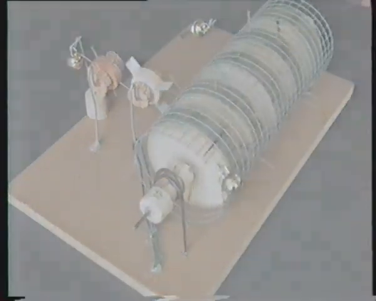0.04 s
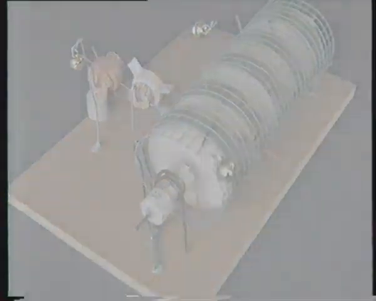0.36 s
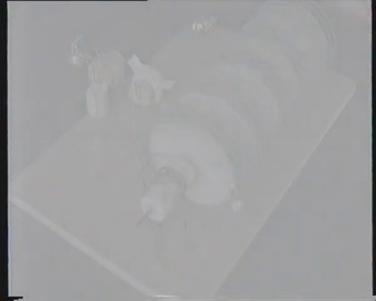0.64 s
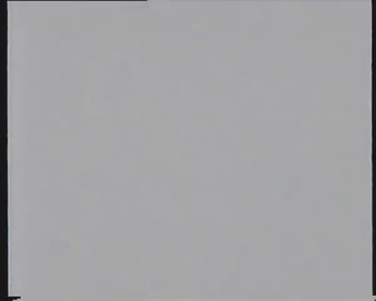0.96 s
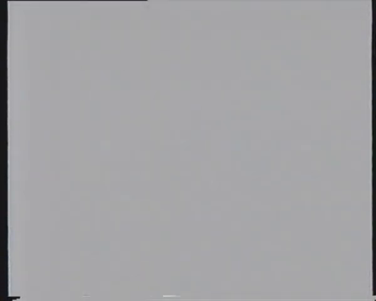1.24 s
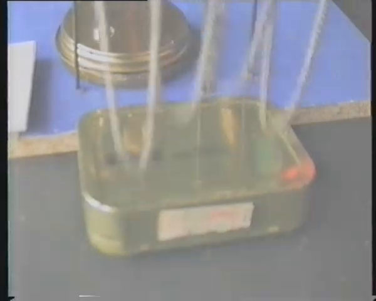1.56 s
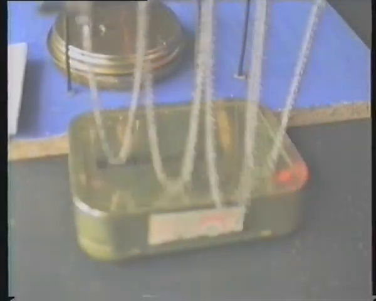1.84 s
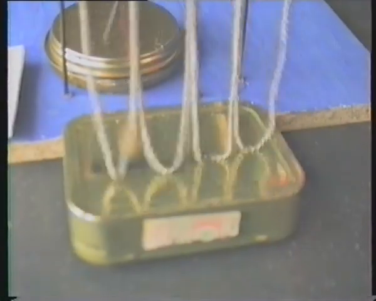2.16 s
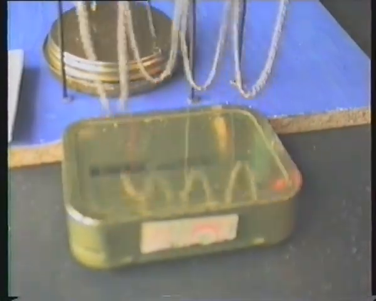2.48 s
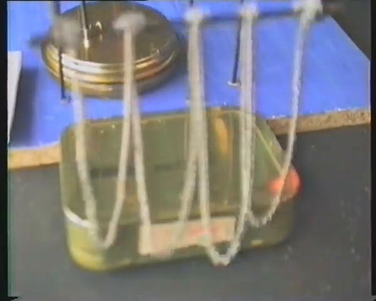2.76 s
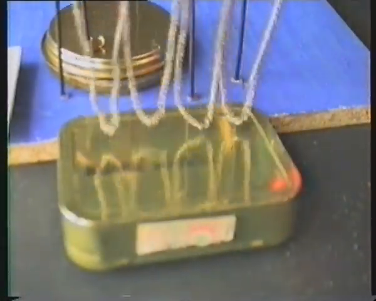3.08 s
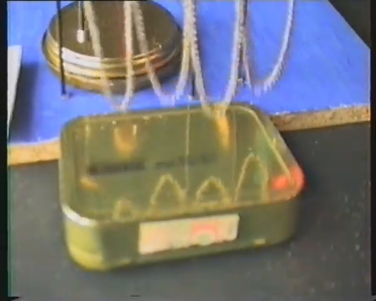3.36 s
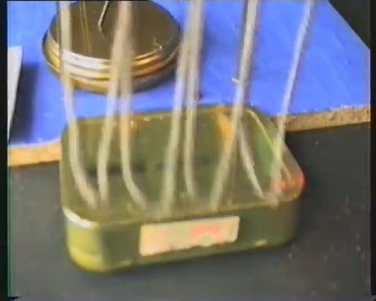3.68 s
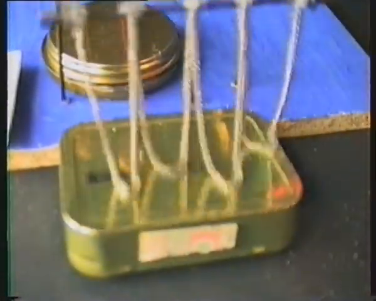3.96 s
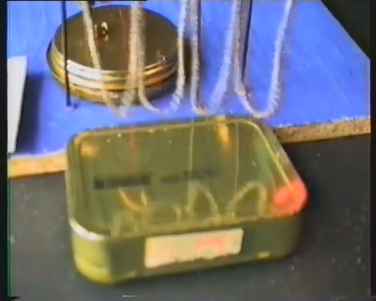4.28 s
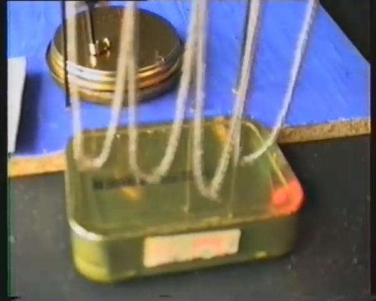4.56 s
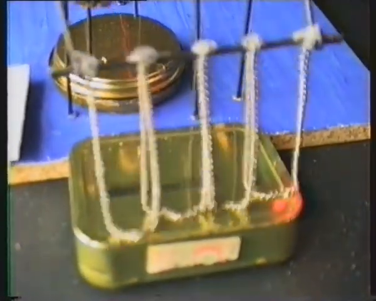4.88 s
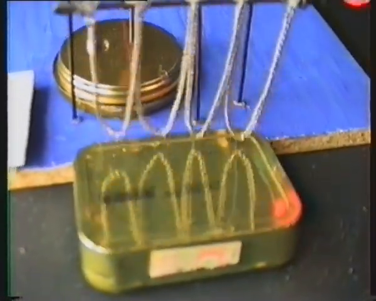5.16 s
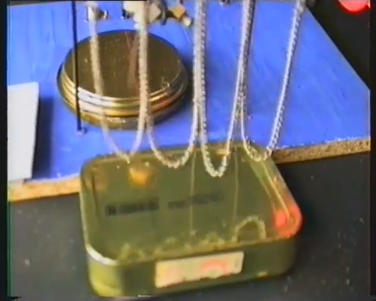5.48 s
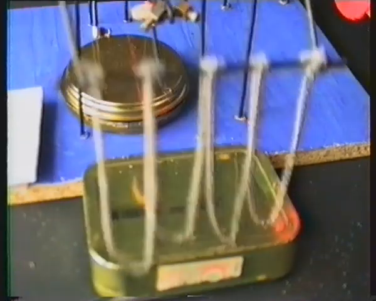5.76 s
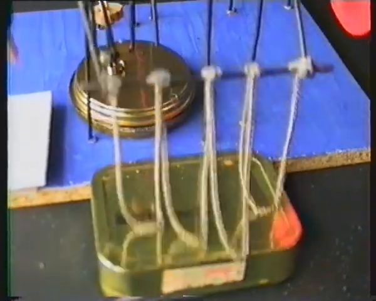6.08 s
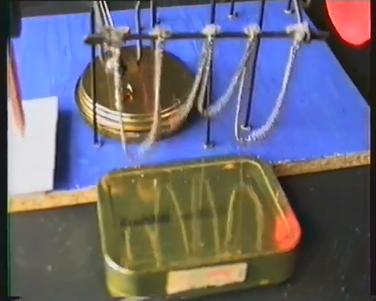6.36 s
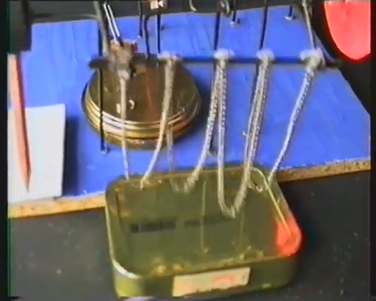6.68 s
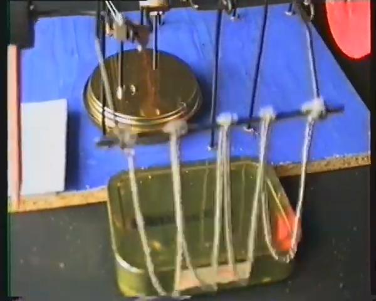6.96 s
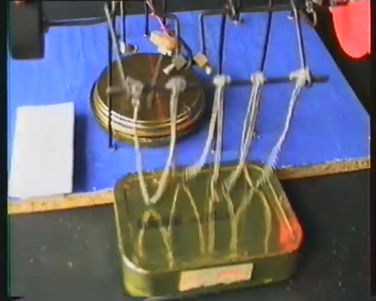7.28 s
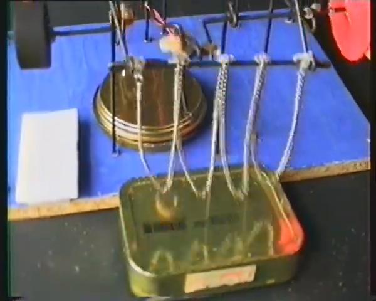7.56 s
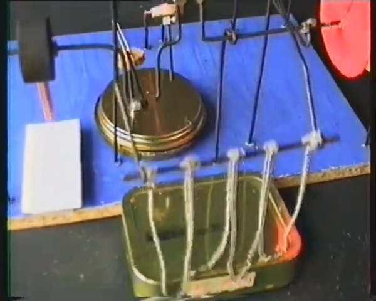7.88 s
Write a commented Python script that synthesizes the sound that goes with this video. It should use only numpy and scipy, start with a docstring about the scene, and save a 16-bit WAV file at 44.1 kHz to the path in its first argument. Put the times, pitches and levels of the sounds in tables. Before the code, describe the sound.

For the first 1.4 seconds there is only faint tape hiss with a slight, steady fluttering buzz, which stays underneath throughout. A couple of tiny clicks follow, and at about 1.8 seconds a hand-cranked wire sculpture starts rattling. Rods knock and chatter on a brass lid with hollow clacks, mixed with brighter clinks from a tin box, in quick, irregular clusters about twice a second. Loops of fine chain drop into the tin in short jingling flurries roughly once a second. Harder knocks leave brief ringing notes that bend in pitch, and a dry bearing gives a few faint, thin squeaks. The clatter is strongest around 2.5, 3.5, 5 to 6, 7 and 7.6 seconds and continues to the end, just past 8 seconds, over a soft baseboard rumble. The sound is dull and mono, through a camcorder microphone, with light room reverberation.

```python
"""Hand-cranked wire sculpture on a classroom table.

With each stroke of the crank, rods jostle, knock and chatter on a brass lid while loops of fine chain
drop into a tin box. Each contact rings a set of decaying modes. A dry bearing squeaks, the baseboard
rumbles and the room reverberates. The sound is dull and mono, through a camcorder whose tape machine
hisses and thumps at its frame rate."""
import sys
import numpy as np
from scipy import signal
from scipy.fft import rfft, irfft
from scipy.io import wavfile
from scipy.ndimage import uniform_filter1d

SR = 44100
rng = np.random.default_rng(int(sys.argv[2]) if len(sys.argv) > 2 else 0)


def materialize(psi):
    """Save the field psi as 16-bit PCM at rate SR to the path in sys.argv[1].

    A 1-D psi becomes a single channel; in a 2-D psi each row is a channel.
    """
    bounded = np.clip(np.atleast_2d(psi).T, -1, 1)
    quanta = np.round(bounded * 32767).astype(np.int16)
    wavfile.write(sys.argv[1], SR, quanta)


N = 358533
TIME_S = np.arange(N) / SR
RING_S = np.arange(SR // 4) / SR  # time axis of one contact

# Table levels are relative; each layer adds its own gain.
# Tape hiss. Each row: frequency in Hz, spectral density in dB.
HISS_SPECTRUM = [(30, -12), (110, -3), (250, -6), (450, -13.5), (700, -16), (1500, -22), (4000, -28),
                 (7300, -28), (8500, -39)]
# Knocks of rods and chain. Each row: start in seconds, lid level in dB, tin level in dB,
# favoured mode in Hz.
KNOCK_HITS = [(1.396, -57.5, -75, 1740), (1.448, -58, -75, 1320), (1.776, -73, -54, 3070),
              (1.8, -62, -41.5, 3060), (1.878, -51, -39, 3180), (1.966, -34, -40.5, 1200),
              (2.013, -33, -34.5, 1270), (2.034, -33, -42, 1070), (2.08, -31.5, -41, 3470),
              (2.132, -45, -40.5, 3010), (2.271, -41.5, -73, 870), (2.345, -62, -49, 2540),
              (2.368, -43, -46.5, 1075), (2.448, -27.5, -33, 880), (2.462, -44, -34, 3110),
              (2.489, -29, -46, 1360), (2.593, -32, -33.5, 2560), (2.67, -41, -44, 5110),
              (2.702, -39, -40, 3070), (2.723, -35.5, -37.5, 4830), (2.878, -53, -34.5, 3470),
              (2.926, -40, -42, 1276), (2.942, -37, -41, 1270), (2.981, -40, -36, 1650),
              (3.049, -40.5, -37.5, 3490), (3.145, -39.5, -82, 850), (3.261, -38.5, -42, 2530),
              (3.31, -36, -43.5, 2970), (3.461, -29.5, -32.5, 1350), (3.51, -26.5, -34.5, 2520),
              (3.531, -35, -46, 1300), (3.555, -33.5, -43, 3060), (3.652, -27.5, -36, 2530),
              (3.687, -34, -35.5, 4760), (3.721, -32, -33, 2530), (3.875, -60, -35.5, 3040),
              (3.939, -32, -37, 3150), (4.074, -28.5, -36.5, 880), (4.114, -33, -47, 1350),
              (4.201, -34, -48, 900), (4.267, -46, -53, 1760), (4.334, -34, -39.5, 1820),
              (4.407, -43, -51, 720), (4.429, -37.5, -43.5, 1750), (4.481, -36.5, -71, 1290),
              (4.512, -33.5, -63, 1750), (4.584, -54, -49, 1310), (4.631, -66, -43, 2850),
              (4.656, -49, -31, 2560), (4.888, -37.5, -32, 3060), (4.952, -32.5, -43, 1220),
              (5.056, -35, -36, 3410), (5.136, -27.5, -31, 1350), (5.166, -35, -42, 840),
              (5.182, -33.5, -35.5, 830), (5.211, -35, -32, 3280), (5.326, -43, -38, 5110),
              (5.441, -31, -35.5, 870), (5.476, -28.5, -39.5, 1860), (5.54, -36, -58, 2860),
              (5.558, -45, -39.5, 2540), (5.602, -32.5, -38, 1290), (5.632, -31.5, -42, 2580),
              (5.688, -31.5, -38.5, 670), (5.74, -39, -43, 2530), (5.749, -36, -31.5, 3170),
              (5.794, -25.5, -30, 3120), (5.804, -28.5, -39, 3130), (5.843, -28, -32, 1300),
              (5.905, -57, -34.5, 2520), (5.96, -40, -38.5, 3430), (6.02, -41, -40, 2540),
              (6.045, -32, -34, 2550), (6.161, -40.5, -54, 920), (6.222, -41, -71, 1230),
              (6.35, -50, -51.5, 3420), (6.409, -37.5, -47.5, 1270), (6.576, -38, -43.5, 1720),
              (6.637, -39, -49, 1340), (6.689, -37, -38, 3310), (6.712, -38.5, -57, 1630),
              (6.731, -37, -37, 1060), (6.829, -45, -47, 2770), (6.871, -48.5, -35, 3180),
              (6.969, -29, -29.5, 2990), (7.021, -26.5, -32, 2120), (7.103, -39, -42, 5040),
              (7.344, -38, -86, 920), (7.408, -48, -43.5, 2540), (7.465, -50, -50, 5700),
              (7.475, -36, -60, 930), (7.545, -26.5, -30.5, 1050), (7.56, -25.5, -33, 3110),
              (7.589, -30.5, -35, 1370), (7.602, -26, -36.5, 1350), (7.696, -33.5, -32.5, 2540),
              (7.789, -52, -34.5, 3010), (7.868, -37, -52, 1730), (8.034, -32.5, -35, 3430),
              (8.096, -39, -35, 2570)]
# Ringing modes of each body. Each row: frequency in Hz, level in dB, T60 in seconds.
LID_MODES = [(155.5, -22, 0.43), (342.6, -14.5, 0.12), (399, -8.5, 0.018), (526.2, 0, 0.15),
             (581.3, -6, 0.17), (789, -18.5, 0.099), (882, -3.5, 0.11), (1051, -5.5, 0.054),
             (1296.5, -5.5, 0.12), (1302.4, -4.5, 0.075), (1390, -25.5, 0.036), (1732, -5, 0.081),
             (1786, -6, 0.057), (2080, -19.5, 0.031)]
TIN_MODES = [(1198, -1.5, 0.11), (1700, -15, 0.43), (2087, -3.5, 0.056), (2535, 2, 0.078),
             (2530, -8.5, 0.074), (3006, 0.5, 0.13), (3122, 3, 0.056), (3450, 1, 0.058), (3430, -6.5, 0.2),
             (3990, -10.5, 0.073), (4410, -5, 0.037), (4540, -1, 0.014), (4920, -10.5, 0.084),
             (5130, -21, 0.027), (5930, -4.5, 0.067), (6252, -10, 0.049), (6900, -17.5, 0.024),
             (7300, -12, 0.05)]
# Dense, fast-dying modes of each body. Each row: frequency in Hz, spectral density in dB.
LID_CRACK_SPECTRUM = [(60, -43.5), (150, -31), (230, -24), (350, -1.5), (530, 3), (700, -1.5), (1300, 1.5),
                      (1700, -7), (2500, -7), (5000, -19), (9000, -45)]
TIN_CRACK_SPECTRUM = [(80, -3), (300, -7.5), (900, -9.5), (2000, -6.5), (2900, 9), (3800, 3), (5600, 0.5),
                      (7000, -4.5), (8000, -9), (8900, -30)]
# Room reverberation. Each row: frequency in Hz, T60 in seconds.
ROOM_DECAY = [(250, 1), (700, 0.96), (1800, 0.54), (4500, 0.26), (8000, 0.53)]
# Linkage strokes, slack to slack, about two a turn. Each row: start in seconds, lid level in dB,
# tin level in dB.
LINKAGE_STROKES = [(1.739, -49.5, -53), (2.302, -41.5, -46), (2.66, -43.5, -54.5), (3.2, -39.5, -51.5),
                   (3.631, -40.5, -38.5), (4.041, -38.5, -46), (4.38, -41, -55), (5.101, -38.5, -51.5),
                   (5.29, -39, -48.5), (5.7, -43, -48), (6.298, -39.5, -52), (6.85, -38, -42.5),
                   (7.361, -36, -42.5), (7.749, -38.5, -40.5)]
# Baseboard rumble. Each row: frequency in Hz, spectral density in dB.
RUMBLE_SPECTRUM = [(15, -2), (30, -21.5), (50, 2), (100, -12), (160, -8.5), (240, -10), (600, -29),
                   (3000, -73)]
# Chain loops dropping into the tin. Each row: start in seconds, length in seconds, level in dB.
CHAIN_DROPS = [(1.875, 0.031, -37), (1.93, 0.23, -44.5), (2.745, 0.057, -28.5), (2.824, 0.072, -30),
               (3.738, .08, -29.5), (3.827, 0.19, -41.5), (4.657, 0.089, -31), (4.76, 0.34, -41.5),
               (4.985, .05, -37.5), (5.966, 0.18, -42.5), (6.955, 0.047, -31.5), (7.04, .08, -32),
               (7.137, 0.093, -34.5), (7.785, 0.29, -35.5)]
# A rod chattering on the lid. Each row: start in seconds, length in seconds, lid level in dB,
# tin level in dB.
ROD_CHATTERS = [(2.393, 0.043, -32.5, -45), (2.452, 0.076, -27.5, -36), (3.392, 0.051, -30.5, -42.5),
                (3.526, 0.052, -28.5, -41), (4.079, .05, -35, -36.5), (4.95, 0.03, -23.5, -31),
                (5.145, .11, -34, -46), (5.331, 0.14, -30, -38), (5.807, .03, -40, -36),
                (5.848, .032, -28.5, -27.5), (6.663, 0.076, -44, -41), (7.149, .04, -29.5, -33),
                (7.561, 0.041, -32.5, -35.5)]
# Modes singing after a hard blow. Each row: start in seconds, length in seconds, start pitch in Hz,
# end pitch in Hz, level in dB.
SINGING_MODES = [(2.453, 0.061, 874, 945, -27.5), (3.384, 0.072, 580, 602, -28.5),
                 (3.391, 0.1, 1700, 1860, -36.5), (3.461, .035, 1072, 1227, -28),
                 (4.079, 0.051, 879, 917, -31), (4.077, 0.035, 504, 558, -24.5),
                 (4.109, 0.085, 541, 675, -29.5), (4.8, 0.1, 567, 446, -34.5),
                 (5.138, 0.014, 1097, 1130, -22), (5.177, 0.052, 836, 873, -32.5),
                 (5.241, .069, 721, 713, -39), (5.395, 0.043, 2810, 3090, -28),
                 (5.688, 0.039, 664, 715, -25.5), (5.796, 0.067, 533, 509, -28),
                 (5.809, .048, 3140, 3100, -33), (5.845, 0.013, 505, 497, -19),
                 (6.988, 0.069, 2996, 3020, -29), (7.217, 0.046, 1712, 1718, -32),
                 (7.597, 0.066, 524, 673, -24)]
# Wire bearing squeaks. Each row: start in seconds, length in seconds, pitch in Hz, level in dB.
BEARING_SQUEAKS = [(2.462, 0.0074, 5350, -32), (3.356, 0.014, 4780, -45.5), (3.364, 0.063, 7220, -48),
                   (4.211, 0.046, 7250, -55.5), (6.475, 0.057, 7250, -53), (7.558, 0.0069, 5330, -34.5)]


def gain(db):
    """Decibels to amplitude."""
    return 10 ** (np.asarray(db) / 20)


def unit_rms(x):
    """Each row scaled to rms 1."""
    return x / np.sqrt(np.mean(x ** 2, axis=-1, keepdims=True) + 1e-20)


def curve_at(points, hz):
    """Table lookup on a log-frequency axis."""
    points_hz, values = np.transpose(points)
    return np.interp(np.log(hz + 1), np.log(points_hz + 1), values)


def add(mix, start_s, sound):
    """Mixes a sound in at start_s."""
    part = mix[round(start_s * SR):][:len(sound)]
    part += sound[:len(part)]


def noise(spectrum, size, count=1):
    """Rows of shaped noise, rms 1."""
    shape = gain(curve_at(spectrum, np.fft.rfftfreq(size, 1 / SR)))
    return unit_rms(irfft(rfft(rng.standard_normal((count, size))) * shape, size))


def tape_machine(frame_s=.04, thump_at_s=.0039, sag_at_s=.0077, thump_s=.0008, sag_s=.0016):
    """An electrical thump and sag per frame, faint buzz, and hiss that starts a little louder."""
    in_frame_s = TIME_S % frame_s
    thump = gain(-51) * np.exp(-.5 * ((in_frame_s - thump_at_s) / thump_s) ** 2)
    sag = gain(-56) * np.exp(-.5 * ((in_frame_s - sag_at_s) / sag_s) ** 2)
    buzz = sum(gain(db) * np.cos(2 * np.pi * hz * (TIME_S - thump_at_s))
               for hz, db in ((125, -80), (250, -73), (375, -73)))
    hiss = gain(np.interp(TIME_S, [.12, .3], [-63.5, -67.5])) * noise(HISS_SPECTRUM, N)[0]
    return thump - sag + buzz + hiss


def strikes(modes, crack_spectrum, count, crack_db, crack_t60_s, tick_db, rise_s):
    """A body struck at count spots, each weighting modes and crack anew. Rms 1 over the first 15 ms."""
    hz, db, t60_s = np.transpose(modes)[:, :, None]
    bank = gain(db - 60 * RING_S / t60_s) * np.exp(2j * np.pi * hz * RING_S)
    weights = gain(rng.uniform(-5.5, 7.2, (count, len(modes))))
    phases = np.exp(2j * np.pi * rng.random((count, len(modes))))
    shift_hz = 5 * rng.standard_normal((count, 1))  # parts resting on the body detune it
    ring = ((weights * phases) @ bank * np.exp(2j * np.pi * shift_hz * RING_S)).imag
    size = len(RING_S)
    bins_hz, knots_hz = np.fft.rfftfreq(size, 1 / SR), np.geomspace(300, 9000, 44)
    knots_db = 6.15 * np.clip(rng.standard_normal((count, len(knots_hz))), -2, 2)
    colour = gain([np.interp(bins_hz, knots_hz, row) for row in knots_db])
    crack = unit_rms(irfft(rfft(noise(crack_spectrum, size, count)) * colour, size))
    fade = gain(crack_db - 60 * RING_S / crack_t60_s) + gain(tick_db) * np.exp(-RING_S / .0022)
    hits = (ring + crack * fade) * (1 - np.exp(-RING_S / rise_s))  # loose parts meet softly
    return hits / np.sqrt(np.mean(hits[:, RING_S < .015] ** 2, axis=1, keepdims=True))


def brass_lid(count):
    """Strikes on the lid: hollow clacks."""
    return strikes(LID_MODES, LID_CRACK_SPECTRUM, count,
                   crack_db=5.5, crack_t60_s=.078, tick_db=8, rise_s=.0013)


def tin_box(count):
    """Strikes on the tin: bright clinks."""
    return strikes(TIN_MODES, TIN_CRACK_SPECTRUM, count,
                   crack_db=11, crack_t60_s=.037, tick_db=9.5, rise_s=.00053)


def knocks(body, levels_db, bounce_db, bounce_s):
    """Each knock rings the body and bounces once, more softly."""
    out, count = np.zeros(N), len(KNOCK_HITS)
    hits, bounces = body(count), body(count)
    delays_s = bounce_s * (.5 + rng.random(count))
    for (start_s, *_), db, hit, bounce, delay_s in zip(KNOCK_HITS, levels_db, hits, bounces, delays_s):
        add(out, start_s, gain(db) * hit)
        add(out, start_s + delay_s, gain(db + bounce_db) * bounce)
    return out


def pings(split_hz=2300, tin_boost_db=2, t60_s=.079):
    """Each knock favours one mode: a low one of the lid or a high one of the tin."""
    out = np.zeros(N)
    fade = gain(-60 * RING_S / t60_s) * (1 - np.exp(-RING_S / .0015))
    for start_s, lid_db, tin_db, hz in KNOCK_HITS:
        db = lid_db if hz < split_hz else tin_db + tin_boost_db
        add(out, start_s, gain(db) * fade * np.sin(2 * np.pi * (hz * RING_S + rng.random())))
    return out


def rattle(body, strength, rate_hz, spread_db, spot_count=18):
    """Small contacts of uneven size and timing, each ringing a random spot of the body."""
    clicks, slots = np.zeros(N), np.arange(int(rate_hz * N / SR) - 1)
    spots, struck = body(spot_count), rng.integers(0, spot_count, N)
    onsets = ((slots + rng.random(N)[slots]) * SR / rate_hz).astype(int)
    sizes = unit_rms(gain(spread_db * np.clip(rng.standard_normal(N)[slots], -2, 2)))
    clicks[onsets] = strength[onsets] * sizes * np.sqrt(SR / rate_hz)
    spots = spots / np.sqrt(np.sum(spots ** 2) / spot_count)
    return sum(signal.oaconvolve(clicks * (struck == k), spot)[:N] for k, spot in enumerate(spots))


def bursts(rows, sag_db, rise_s=.00088):
    """Envelope of runs of contacts: fast rise, then a sag."""
    out = np.zeros(N)
    for start_s, length_s, db in rows:
        t = np.arange(round(length_s * SR)) / SR
        add(out, start_s, gain(db + sag_db * t / length_s) * (1 - np.exp(-t / rise_s)))
    return out


def loose_buzz(levels_db, length_s=.018):
    """Envelope of loose parts buzzing after each knock."""
    return bursts([(row[0], length_s, db) for row, db in zip(KNOCK_HITS, levels_db)], sag_db=-11)


def room(x, reflections_per_s=2500, predelay_s=.004):
    """Sparse reflections of random sign; each band decays at its own rate."""
    taps = rng.choice([-1., 1.], SR // 2) * (rng.random(SR // 2) < reflections_per_s / SR)
    taps[:round(predelay_s * SR)] = 0
    hz, t, bands = signal.stft(taps, SR, nperseg=256)
    decay = gain(-60 * t / curve_at(ROOM_DECAY, hz)[:, None])
    tail = signal.istft(bands * decay, SR, nperseg=256)[1]
    return signal.oaconvolve(x, tail / np.linalg.norm(tail))[:N]


def jostle(levels_db, slack_db, slack_share=.22, last_slack_s=8.3):
    """Envelope of the jostling linkage: steady under load, dipping when slack between strokes."""
    starts_s = np.transpose(LINKAGE_STROKES)[0]
    stroke = np.interp(TIME_S, np.append(starts_s, last_slack_s), np.arange(len(starts_s) + 1))
    slack = np.exp(-((stroke - np.round(stroke)) / slack_share) ** 2)
    load_db = levels_db[np.minimum(stroke.astype(int), len(starts_s) - 1)]
    return gain(load_db + slack_db * slack) * (TIME_S > starts_s[0])


def wires(count, low_hz=1650, high_hz=7400, t60_s=.11, db_per_octave=-3.5):
    """Rods and chain links ring briefly, each at its own pitch; small high ones are weaker."""
    place = (np.arange(count) + rng.random(count)) / count
    hz = low_hz * (high_hz / low_hz) ** place[:, None]
    fade = gain(db_per_octave * np.log2(hz / low_hz) - 60 * RING_S / t60_s)
    return fade * (1 - np.exp(-RING_S / .00079)) * np.sin(2 * np.pi * hz * RING_S)


def rod_scrapes(count, low_hz=620, high_hz=1900, t60_s=.16, glide_per_s=1.5):
    """A rod slides on the lid: short hollow notes bending up or down."""
    place, bend = rng.random((2, count, 1))
    hz = low_hz * (high_hz / low_hz) ** ((np.arange(count)[:, None] + place) / count)
    cycles = hz * (RING_S + glide_per_s * (bend - .5) * RING_S ** 2)
    return gain(-60 * RING_S / t60_s) * (1 - np.exp(-RING_S / .0023)) * np.sin(2 * np.pi * cycles)


def baseboard_rumble(level_db=-61, fade_in_s=(1.75, 2.6)):
    """The baseboard rumbles once the crank turns."""
    return gain(level_db) * np.interp(TIME_S, fade_in_s, [0, 1]) * noise(RUMBLE_SPECTRUM, N)[0]


def falling_chain():
    """Envelope of chain landing in the tin, thinning as the loops settle."""
    return bursts(CHAIN_DROPS, sag_db=-6.5, rise_s=.0034)


def tin_ring(chain, lag_s=.031):
    """Falling chain keeps the tin's clearest modes singing."""
    pole = np.exp(-1 / (lag_s * SR))
    modes = sum(gain(db) * np.sin(2 * np.pi * hz * TIME_S)
                for hz, db in ((1187, -19), (1718, -18), (2562, -19), (3018, -11)))
    return signal.lfilter([1 - pole], [1, -pole], chain) * modes


def rod_chatter(levels_db):
    """Envelope of a rod's weakening bounces on the lid."""
    return bursts([(*row[:2], db) for row, db in zip(ROD_CHATTERS, levels_db)], sag_db=-3.5)


def singing_modes(trim_db=-1.5, fall_db=12):
    """Single modes sing out after a hard blow and bend as the rod presses on."""
    out = np.zeros(N)
    for start_s, length_s, start_hz, end_hz, db in SINGING_MODES:
        progress = np.linspace(0, 1, round(length_s * SR))
        waver = .002 * unit_rms(uniform_filter1d(rng.standard_normal(len(progress)), size=150))
        cycles = np.cumsum((start_hz + (end_hz - start_hz) * progress) * (1 + waver)) / SR
        window = np.minimum(progress / .064, 1) * (1 - progress ** 6)
        add(out, start_s, gain(db + trim_db - fall_db * progress) * window * np.sin(2 * np.pi * cycles))
    return out


def bearing_squeaks(width_hz=170, upper_ratio=1.12, upper_db=-7):
    """A dry wire bearing: thin, broken squeaks with a weaker partial just above."""
    out = np.zeros(N)
    for start_s, length_s, hz, db in BEARING_SQUEAKS:
        size = round(length_s * SR)
        bins_hz = np.fft.rfftfreq(size, 1 / SR)
        bands = np.exp(-.5 * ((bins_hz - hz) / width_hz) ** 2)
        bands += gain(upper_db) * np.exp(-.5 * ((bins_hz - upper_ratio * hz) / width_hz) ** 2)
        squeak = unit_rms(irfft(rfft(rng.standard_normal(size)) * bands, size))
        add(out, start_s, gain(db) * squeak * signal.windows.tukey(size))
    return out


def scene():
    """The sculpture in the room, over rumble and tape noise; both channels equal."""
    _, knock_lid_db, knock_tin_db, _ = np.transpose(KNOCK_HITS)
    _, _, chatter_lid_db, chatter_tin_db = np.transpose(ROD_CHATTERS)
    _, stroke_lid_db, stroke_tin_db = np.transpose(LINKAGE_STROKES)
    chain = falling_chain()
    # Contact envelopes add in power. The chain also shakes the lid a little.
    lid_bounces = np.hypot(rod_chatter(chatter_lid_db), loose_buzz(knock_lid_db - 4))
    tin_bounces = np.hypot(rod_chatter(chatter_tin_db), loose_buzz(knock_tin_db - 3))
    lid_flurry = np.hypot(gain(-10) * chain, lid_bounces)
    tin_flurry = np.hypot(chain, tin_bounces)
    lid_jostle = jostle(stroke_lid_db, slack_db=-9)
    tin_jostle = jostle(stroke_tin_db, slack_db=-13.5)

    lid = gain(-5) * knocks(brass_lid, knock_lid_db, bounce_db=-4.5, bounce_s=.012)
    lid += gain(-6.5) * rattle(brass_lid, lid_flurry, rate_hz=300, spread_db=2.5)
    lid += gain(-6) * rattle(brass_lid, lid_jostle, rate_hz=140, spread_db=3.5)
    tin = gain(-4) * knocks(tin_box, knock_tin_db, bounce_db=-10, bounce_s=.0045)
    tin += gain(-2.5) * rattle(tin_box, tin_flurry, rate_hz=450, spread_db=6)
    tin += gain(-3.5) * rattle(tin_box, tin_jostle, rate_hz=55, spread_db=.5)
    rods = rattle(wires, np.hypot(tin_flurry, tin_jostle), rate_hz=130, spread_db=4, spot_count=36)
    rods += rattle(rod_scrapes, np.hypot(lid_flurry, lid_jostle), rate_hz=45, spread_db=6, spot_count=14)
    ringing = pings() + tin_ring(chain) + singing_modes()
    sculpture = lid + tin + gain(-11) * rods + ringing + bearing_squeaks()
    mono = sculpture + gain(-12.5) * room(sculpture) + baseboard_rumble() + tape_machine()
    return np.array([mono, mono])


def record(dry):
    """The camcorder's steep low-pass."""
    cutoff_hz = 8750
    lowpass = signal.firwin(301, cutoff_hz, window=("kaiser", 9), fs=SR)
    return signal.oaconvolve(dry, lowpass[None], "same")


dry = scene()
out = record(dry)
materialize(out)
```